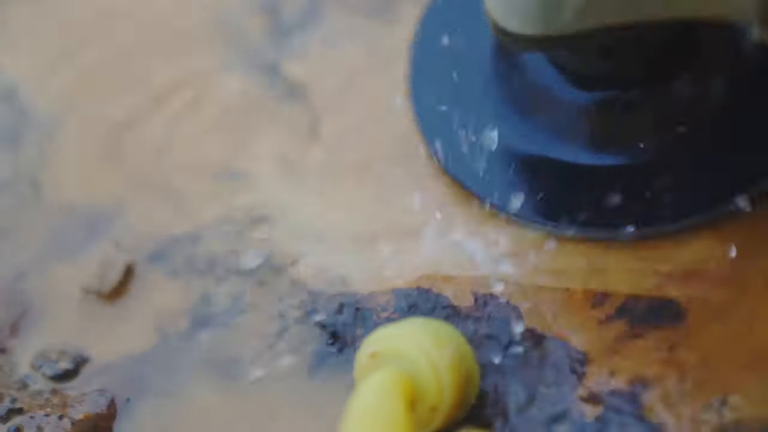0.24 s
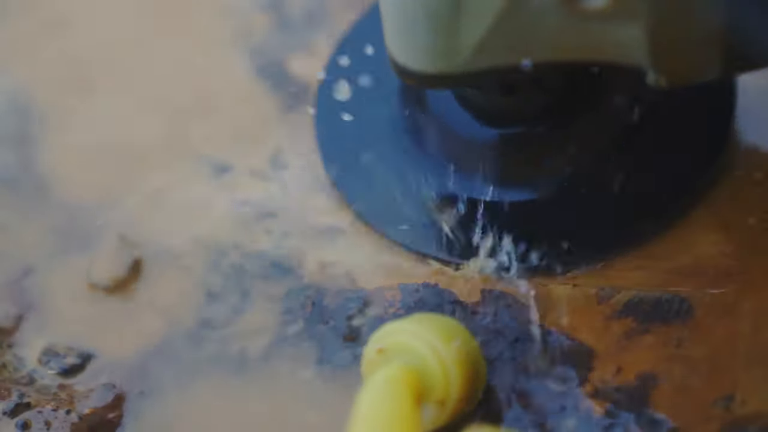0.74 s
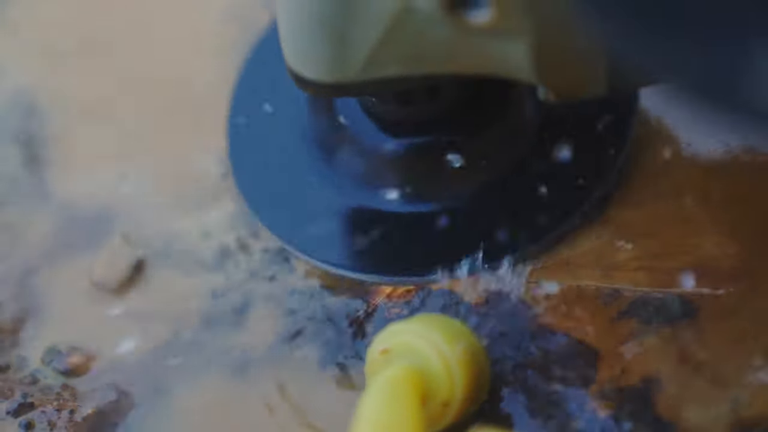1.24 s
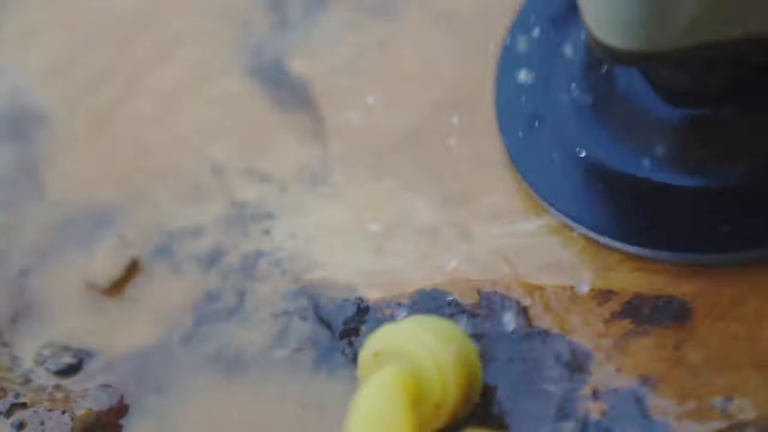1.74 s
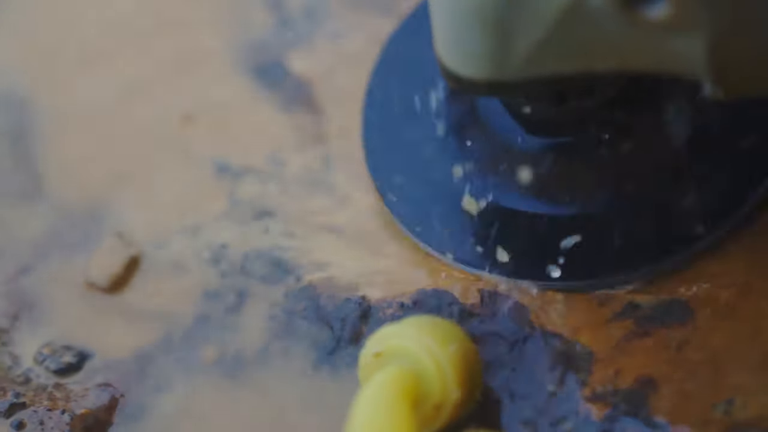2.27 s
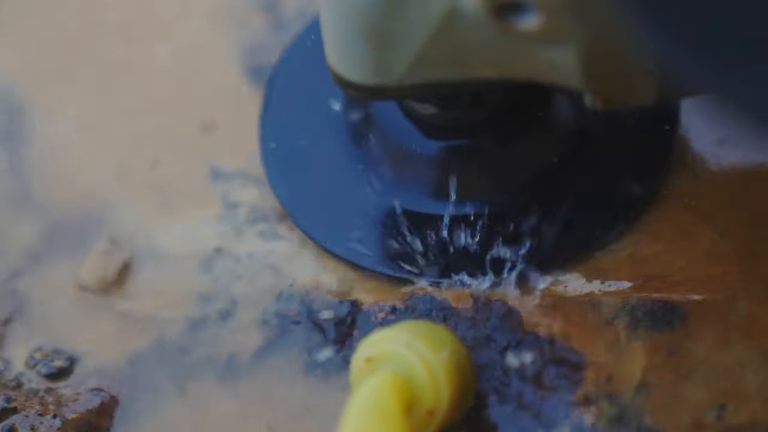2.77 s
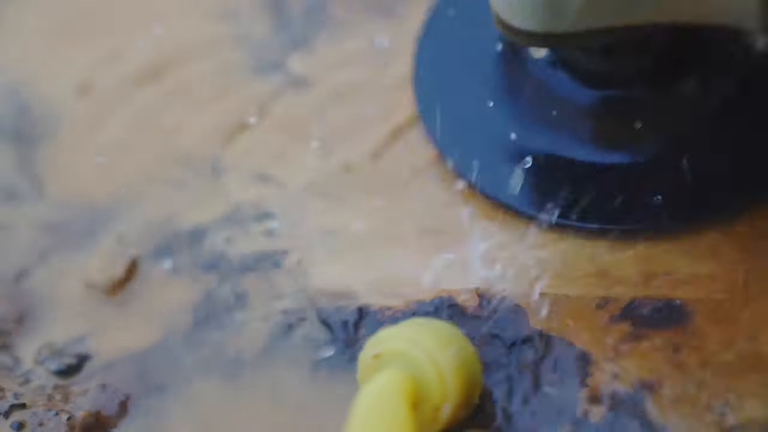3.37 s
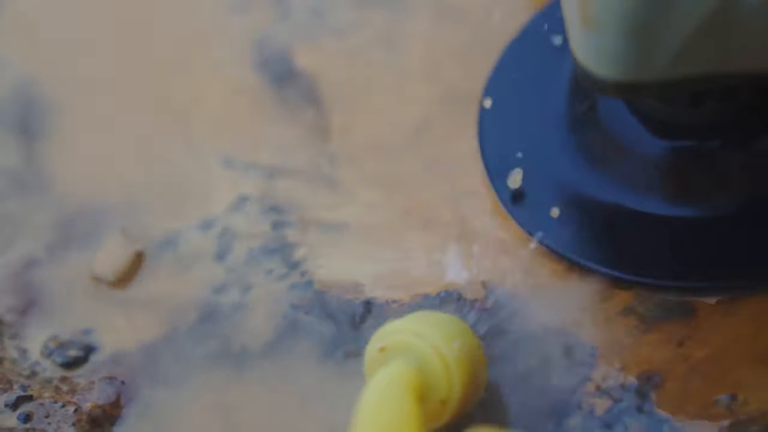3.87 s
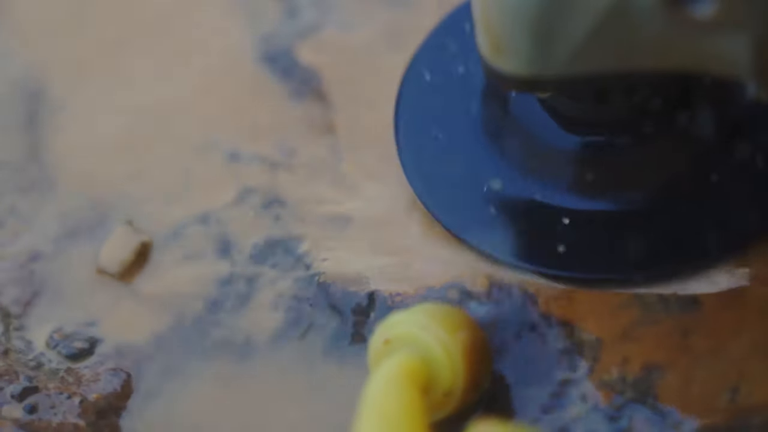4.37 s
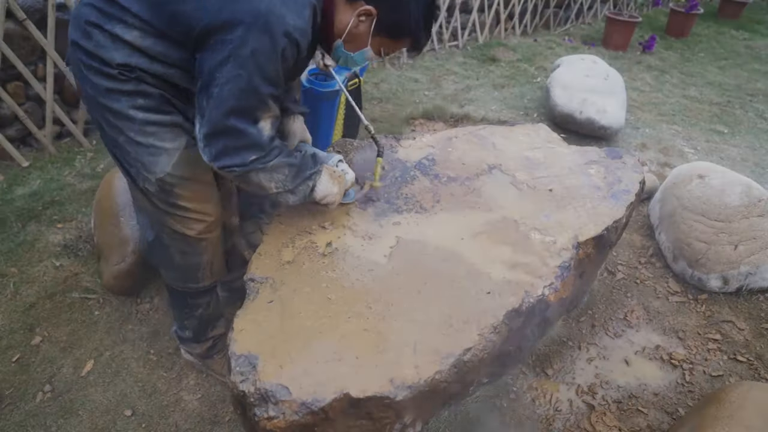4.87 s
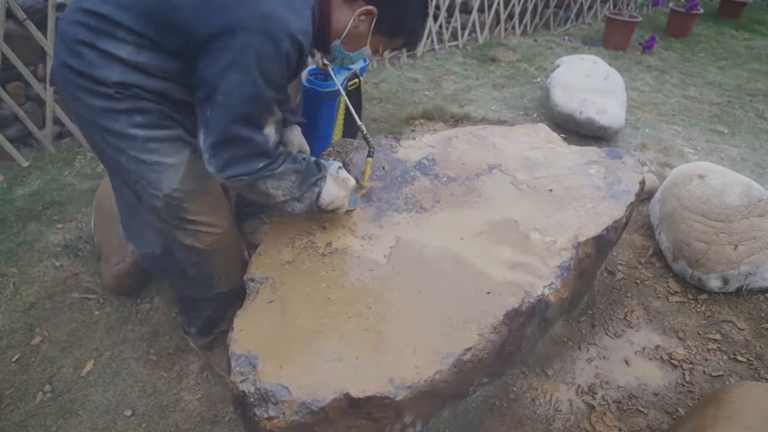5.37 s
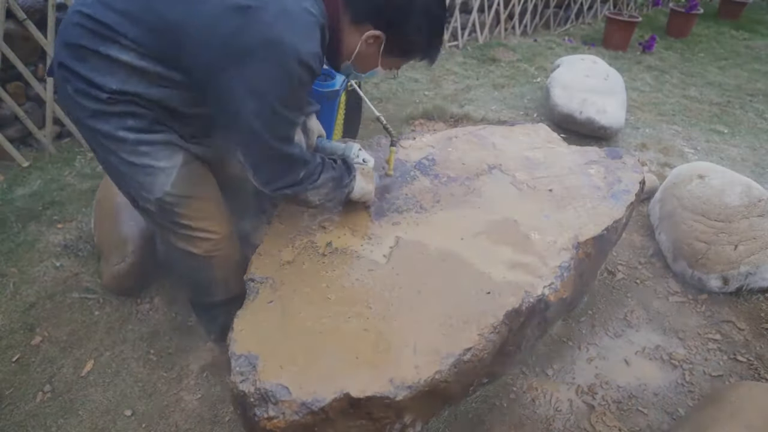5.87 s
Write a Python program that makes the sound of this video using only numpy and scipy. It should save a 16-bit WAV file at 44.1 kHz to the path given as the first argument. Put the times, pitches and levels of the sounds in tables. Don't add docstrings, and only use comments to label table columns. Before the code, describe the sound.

Close up outdoors, an electric grinder works a wet stone slab with a coarse, pulsing scrape. Pressing slows the motor, bringing gear whine, knocks and a low stone rumble; easing off lets it speed up with a clearer fan tone and bright disc ringing towards the right. After four and a half seconds it cuts to a view a few metres off: a steadier, nearly centred resonant hiss with soft puffs of water spray.

```python
import sys
import numpy as np
from scipy import signal
from scipy.fft import rfft, irfft, next_fast_len
from scipy.io import wavfile
from scipy.ndimage import uniform_filter1d, map_coordinates

SR = 44100
rng = np.random.default_rng(int(sys.argv[2]) if len(sys.argv) > 2 else 0)


def invert_db(level):
    return 10 ** (np.asarray(level, dtype=float) / 20)


def master(y):
    cut = np.clip(np.atleast_2d(y).T, -1, 1)
    pcm = np.round(cut * 32767)
    wavfile.write(sys.argv[1], SR, pcm.astype(np.int16))


N = 269892
TIME = np.arange(N) / SR
CHANGE_S = 4.568

# t/s, contact with the stone level/dB, left-right lean level/dB
HAND = [(0, -26, 0.5), (.18, -24.5, -2), (.36, -26, -6), (.7, -25, -3.5), (1, -25, -1.5), (1.42, -26.5, -1),
        (1.6, -25, -1.5), (1.75, -27, -8), (2.15, -26.5, -4.5), (2.46, -26, -2), (2.8, -24.5, -2),
        (3.18, -26, .5), (3.41, -25, -2.5), (3.53, -29.5, -8), (3.9, -31.5, -7), (4.0, -27.5, -5.5),
        (4.2, -29, -5.5), (4.56, -28.5, -3.5)]
# t/s, spindle f/Hz, torque on the gears level/dB
SPINDLE = [(0.0, 77.4, -5), (0.23, 96.45, -7), (0.47, 105.5, -16), (0.93, 79.49, -4.5), (1.3, 73.87, -2.5),
           (1.5, 82.13, 2), (1.74, 102.8, -12), (1.97, 104.4, -8), (2.28, 79.75, -8), (2.58, 71.23, -2),
           (2.98, 73.7, 1.5), (3.14, 77.1, 0.5), (3.25, 84.44, 4.5), (3.42, 98.94, -3), (3.58, 105.4, -18),
           (3.86, 103.7, -5), (4.28, 77.5, -4.5), (4.57, 71.25, -8)]
# t/s, half length t/s, depth level/dB
SKIPS = [(.645, .015, -2), (0.831, 0.017, -3), (1.468, 0.0073, -2), (1.563, 0.013, -1.5),
         (1.81, 0.016, -1.5), (1.874, .012, -1.5), (2.039, .015, -0.5), (2.28, .012, -3), (3.27, .012, -2),
         (3.41, .015, -1), (4.036, .012, -3.5), (4.508, .015, -2.5), (4.584, 0.0073, -3.5),
         (5.217, 0.019, -10.5), (5.368, 0.0075, -4.5), (5.551, 0.021, -8), (5.779, 0.01, -6.5),
         (5.835, .012, -1), (5.868, .008, -5.5)]
# t/s, hiss level/dB, spray level/dB
FAR_LEVELS = [
    (4.58, -25.5, -62),
    (4.67, -24.5, -38),
    (4.77, -24.5, -52),
    (4.88, -25.5, -36),
    (5.05, -24.5, -44.5),
    (5.16, -24.5, -34),
    (5.45, -24, -35),
    (5.85, -24.5, -39),
    (6.12, -23, -34),
]

# f/Hz, density level/dB
SCRAPE_COLOUR = [(590, -41), (1000, -20.5), (1450, -11.5), (2360, -6.5), (2740, -5), (4410, -2.5),
                 (5070, -6.5), (8260, -12.5), (9720, -28), (16000, -47)]
# f/Hz, width f/Hz, level/dB
SCRAPE_MODES = [(1900, 175, 8.5), (2330, 140, 0.67), (2475, 24, 2.4), (3000, 430, 3.4), (4486, 120, 5.3),
                (4800, 130, 2.2)]
# f/Hz, density level/dB
SLAB_COLOUR = [(12, -71), (28, -25), (64, -26), (165, -18), (399, -11), (582, -5), (801, -8), (914, -3),
               (1060, -12), (1800, -9), (2340, -5), (3960, -120)]
# f/Hz, width f/Hz, level/dB
SLAB_MODES = [(200, 13, -1.5), (660, 105, 3), (1240, 100, 10)]
# f/Hz, width f/Hz, level/dB
SLAB_RING = [(908, 26, 0)]
# f/Hz, width f/Hz, level/dB
GEAR_CASE = [(700, 400, -10), (1150, 500, -9), (1950, 450, -2), (2500, 350, 0), (3600, 1500, -8),
             (5000, 2500, -11)]
# f/Hz, width f/Hz, level/dB
CASE_RING = [(2545, 60, 0), (4480, 120, -2)]

# f/Hz, width f/Hz, level/dB
PRESSED = [(5620, 520, -3), (5820, 89, 0.5)]
# f/Hz, width f/Hz, level/dB
FREE = [(6410, 93, 0), (6606, 150, 0)]
# f/Hz, width f/Hz, level/dB
DISC_LOOSE = [(7300, 110, -13), (7840, 160, -3.5), (8210, 97, -5), (8970, 130, -0.5), (9080, 85, -6),
              (9200, 70, -2.5)]
# f/Hz, width f/Hz, level/dB
DISC_HELD = [(7380, 130, -6), (7780, 80, -5), (8080, 300, -4), (8100, 300, -10), (8660, 170, -10.5),
             (8940, 155, -1.5)]
# f/Hz, width f/Hz, level/dB
DISC_TOP_LOOSE = [(10380, 154, -1), (11200, 130, -10.5), (11490, 91, 0), (12640, 120, -3), (13000, 90, -5),
                  (13500, 700, -14), (14350, 200, -7.5), (15440, 230, -7)]
# f/Hz, width f/Hz, level/dB
DISC_TOP_HELD = [(10520, 190, 0.5), (11440, 200, -3.5), (11700, 100, -1.5), (12660, 260, 0),
                 (12800, 110, -6), (14380, 230, -2.5), (15500, 260, -4.5)]

# f/Hz, width f/Hz, level/dB
FAR_MODES = [(3600, 200, -4), (3780, 170, -2), (4090, 170, -2), (4480, 280, -5), (5630, 190, -1),
             (6050, 190, 0), (6930, 150, -3), (7670, 100, -2)]
# f/Hz, width f/Hz, level/dB
FAR_TOP = [(9120, 130, 3), (10800, 310, 1.5), (11200, 300, -5), (12400, 300, -13), (12800, 200, -8),
           (14000, 270, 0)]
# f/Hz, width f/Hz, level/dB
SPLASH = [(2320, 390, -6), (2790, 710, 0)]
# f/Hz, density level/dB
FAR_LOW = [(12, -58), (50, -25), (188, -20), (340, -13.5), (465, -16.5), (676, -7), (1020, -8.5),
           (1170, -5), (2200, -1), (2860, -27), (4840, -120)]
# f/Hz, density level/dB
FAR_BED = [(1200, -56), (3400, -6.5), (4850, -6), (5700, 2.5), (8640, -10), (14000, -12), (14450, -20),
           (15800, -20)]
# f/Hz, left-right likeness
NEAR_ALIKE = [(60, 0.65), (180, 0.91), (550, 0.86), (1650, 0.63), (4970, 0.45), (15000, 0.35)]
# f/Hz, left-right likeness
FAR_ALIKE = [(60, 0.52), (180, 0.95), (550, 0.98), (1650, 0.88), (4970, 0.72), (15000, 0.77)]

UPRIGHT_DB, TIPPED_DB = -1, -8
USUAL_CONTACT_DB = -26
# level/dB running free, gain/dB under load (fan: braking), dB per dB of contact
UNBALANCE, SECOND, FAN, UPPER = (-75, 13.6, 2.21), (-60.5, -4, 0.3), (-41.5, -9.5, -0.33), (-44, -13, -0.85)
# level/dB tipped, gain/dB lying flat, dB per dB of contact
SLAB_LAW, PRESSED_LAW, FREE_LAW = (-36.5, 4.46, 1), (-34.5, 10.3, 0.35), (-29, -5.5, 0.093)
TOP_LAW, RING_LAW = (-28.5, -3.1, 0.18), (-26.5, 0.11, 0.12)


def grind(held, turns):
    contact_db, pan_db, flat = hand()
    slab_db = law(SLAB_LAW, (flat + held) / 2, contact_db)
    pressed_db = law(PRESSED_LAW, flat ** 1.44, contact_db)
    bite = throb(turns, beat_db=2.1, grit_db=1.1)
    face = worn(turns, life=7)
    blows = knocks(turns, sharp=9, scatter_db=1.3)

    def scrape_gain(hz):
        return invert_db(along(SCRAPE_COLOUR, hz)) * np.hypot(1, peaks(SCRAPE_MODES, hz))

    def slab_gain(hz):
        return invert_db(along(SLAB_COLOUR, hz)) * np.hypot(1, peaks(SLAB_MODES, hz))

    scrape = hiss(scrape_gain, NEAR_ALIKE, bite, patchy_db=1.1, repeat=0.45 * face)
    knock = hiss(lambda hz: peaks(GEAR_CASE, hz) ** 1.3, NEAR_ALIKE, blows, patchy_db=1.2)
    hum = hiss(lambda hz: peaks(CASE_RING, hz) ** 1.8, NEAR_ALIKE, bite, patchy_db=0.5)
    slab = hiss(slab_gain, NEAR_ALIKE, bite, patchy_db=1.8, lag_s=3e-5, repeat=0.42 * face)
    note = hiss(lambda hz: peaks(SLAB_RING, hz) ** 2.0, NEAR_ALIKE, 1, patchy_db=6.0)
    pressed = hiss(lambda hz: peaks(PRESSED, hz) ** 1.03, [(6000, 0.56)], bite, patchy_db=1.5)

    case = invert_db(-8 + 3.5 * held) * knock + invert_db(-22 + 15 * held) * hum
    broad = invert_db(contact_db - 0.5) * (scrape + case) + invert_db(pressed_db - 1.5) * pressed
    low = invert_db(slab_db - 1.5) * (slab + invert_db(-16 + 8.5 * held) * note)
    return placed(broad, pan_db) + placed(low, 0.22 * pan_db)


def disc(held, turns):
    contact_db, lean_db, flat = hand()
    ring_db = law(RING_LAW, flat, contact_db)
    free_db = law(FREE_LAW, flat, contact_db)
    top_db = law(TOP_LAW, flat, contact_db)
    pan_db = 1.04 * lean_db - 3
    loose, tight = np.cos(np.pi / 2 * held), np.sin(np.pi / 2 * held)
    stir = throb(turns, beat_db=1.4, grit_db=0.93)

    def sing(modes, alike, lag_s, steep=1.15):
        return hiss(lambda hz: peaks(modes, hz) ** steep, [(9000, alike)], stir, patchy_db=3.5, lag_s=lag_s)

    middle = loose * sing(DISC_LOOSE, 0.42, 0.00013) + tight * sing(DISC_HELD, 0.64, 0.00013)
    top = loose * sing(DISC_TOP_LOOSE, 0.17, 0, steep=1.2) + tight * sing(DISC_TOP_HELD, 0.42, 0, steep=1.1)
    free = invert_db(free_db + 0.5) * sing(FREE, 0.89, 4e-5)
    return placed(invert_db(ring_db + 1.03) * middle + invert_db(top_db + 0.3) * top + free, pan_db)


def motor(speed, torque_db, held, turns):
    contact_db = hand()[0]
    slowing = -uniform_filter1d(np.gradient(speed) * SR, size=4000)
    braking = np.clip(slowing / 52, 0, 1)
    first_db = law(UNBALANCE, held, contact_db)
    second_db = law(SECOND, held, contact_db)
    upper_db = law(UPPER, held, contact_db)
    fan_db = law(FAN, braking, contact_db)
    mesh_db = -31 + torque_db
    shudder_s, half_s, shudder_db = 3.97, 0.1, 11
    second_db = second_db + shudder_db * np.exp(-((TIME - shudder_s) / half_s) ** 2)

    def tone(order, rough):
        return invert_db(3.2 * wobble(24.91)) * np.sin(2 * np.pi * order * turns + rough * wobble(35))

    mesh = 0
    for order, share in [(31, 0.35), (32, 0.8), (33, 0.6), (34, 0.4)]:
        mesh = mesh + peaks([(2450, 800, 0)], order * speed) * share * tone(order, 1.5)
    second = 1.24 * peaks([(198, 20, 0)], 2 * speed) * tone(2, 0.53)
    shake = second + 1.05 * tone(3, 0.58) + 0.79 * tone(4, 0.4)
    low = invert_db(first_db - 0.5) * tone(0.98, 0.2) + invert_db(second_db + 1.0) * shake
    whine = invert_db(fan_db + 2.5) * tone(12, 0.94) + invert_db(upper_db + 1.0) * tone(18, 1.0) + invert_db(mesh_db + 3.5) * mesh
    return low + whine * invert_db([[-1.5], [1.5]])


def distant():
    hiss_db, splash_db = curves(FAR_LEVELS)
    since = np.maximum(TIME - CHANGE_S, 0)
    low_db = -49 + 5.5 * since
    top_db = -32.5 - 17 * np.exp(-since / 0.11)
    chatter = throb(76 * TIME, beat_db=0.3, grit_db=0.36)

    def body_gain(hz):
        return np.hypot(peaks(FAR_MODES, hz) ** 1.4, invert_db(along(FAR_BED, hz) - 7))

    body = hiss(body_gain, FAR_ALIKE, chatter, patchy_db=2.2, lag_s=-2e-5)
    low = hiss(lambda hz: invert_db(along(FAR_LOW, hz)), FAR_ALIKE, chatter, patchy_db=3.0)
    splash = hiss(lambda hz: peaks(SPLASH, hz) ** 1.44, FAR_ALIKE, chatter, patchy_db=3.5)
    top = hiss(lambda hz: peaks(FAR_TOP, hz) ** 1.3, FAR_ALIKE, chatter, patchy_db=4.3, lag_s=-0.000023)
    near_ground = invert_db(hiss_db + 3.0) * body + invert_db(low_db + 1.6) * low
    return near_ground + invert_db(splash_db) * splash + invert_db(top_db - 1.0) * top


def hand():
    contact_db, lean_db = curves(HAND)
    return contact_db, lean_db, np.clip((lean_db - TIPPED_DB) / (UPRIGHT_DB - TIPPED_DB), 0, 1)


def law(rule, share, contact_db):
    base_db, gain_db, follows = rule
    return base_db + gain_db * share + follows * (contact_db - USUAL_CONTACT_DB)


def throb(turns, beat_db, grit_db):
    once = (1 + 0.35 * wobble(15)) * np.cos(2 * np.pi * (turns - 0.5))
    twice = 0.4 * np.cos(4 * np.pi * turns + 0.8 * wobble(8))
    grit = wobble(70) + 0.3 * wobble(25) + 0.6 * wobble(300)
    return invert_db(beat_db * (once + twice) + grit_db * grit)


def worn(turns, life, count=160):
    face = rng.standard_normal((2, int(turns[-1] / life) + 3, count))
    face = np.concatenate([face, face[..., :3]], axis=2)
    place = [turns / life, turns % 1 * count + 1]
    return np.array([unit(map_coordinates(side, place, order=2)) for side in face])


def knocks(turns, sharp, scatter_db):
    whole = np.floor(turns).astype(int)
    size, late = rng.standard_normal((whole[-1] + 1, 2)).T
    from_blow = turns - whole - 0.5 - 0.06 * late[whole]
    return invert_db(scatter_db * size[whole]) * np.exp(-(sharp * from_blow) ** 2)


def hiss(gain, alike, drive, patchy_db, lag_s=0, repeat=0):
    z = signal.stft(rng.standard_normal((2, N)) + repeat, nperseg=512)[2]
    field = uniform_filter1d(rng.standard_normal(z.shape), size=4, axis=1)
    field = uniform_filter1d(field, size=10, axis=2)
    patchy = z * invert_db(patchy_db * field / field.std())
    pair = signal.istft(patchy, nperseg=512)[1][:, :N] * drive
    size = next_fast_len(N + 8192)
    hz = np.fft.rfftfreq(size, 1 / SR)
    turn = np.arccos(np.clip(along(alike, hz), -1, 1)) / 2
    common, opposed = rfft(pair, size) * gain(hz) * [np.cos(turn), np.sin(turn)]
    ramp = np.exp(1j * np.pi * hz * lag_s)
    sides = np.array([(common + opposed) / ramp, (common - opposed) * ramp])
    return unit(irfft(sides, size)[:, :N])


def peaks(modes, hz):
    power = 0
    for centre, width, db in modes:
        power = power + invert_db(2 * db) * (hz * width) ** 2 / ((centre ** 2 - hz * hz) ** 2 + (hz * width) ** 2)
    return np.sqrt(power)


def placed(pair, pan_db):
    gains = invert_db(np.array([pan_db / 2, -pan_db / 2]))
    return pair * gains / gains.mean(0)


def wobble(rate):
    return map_coordinates(rng.standard_normal(int(N * rate / SR) + 4), [TIME * rate], order=2)


def curves(rows):
    s, *columns = np.transpose(rows)
    return [np.interp(TIME, s, column) for column in columns]


def along(points, hz):
    f, v = np.transpose(points)
    return np.interp(np.log(hz + 1), np.log(f + 1), v)


def unit(x):
    return x / np.sqrt(np.mean(np.atleast_2d(x).mean(0) ** 2) + 1e-20)


def scene():
    speed, torque_db = curves(SPINDLE)
    turns = np.cumsum(speed) / SR
    held = np.clip((99 - speed) / 21, 0, 1)
    near = grind(held, turns) + disc(held, turns) + motor(speed, torque_db, held, turns)
    away = np.clip((TIME - CHANGE_S) / 0.0017, 0, 1)
    dips_db = sum(db * np.exp(-((TIME - s) / half_s) ** 4) for s, half_s, db in SKIPS)
    return invert_db(dips_db) * ((1 - away) * near + away * distant())


def low_pass(x):
    return signal.sosfilt(signal.butter(12, 16470, fs=SR, output="sos"), x)


def record(dry):
    dry = dry / (1 + np.abs(dry / 0.8) ** 4) ** (1 / 4)
    hz, _, z = signal.stft(dry, SR, nperseg=2048, noverlap=1024)
    power = np.abs(z[:, :1024]) ** 2
    bands = power.reshape(2, 64, 16, -1).mean(2).repeat(16, 1)
    heard = bands > power.mean((0, 1)) * invert_db(-2 * 12.6)
    below = hz[:1024, None]
    z[:, :1024] *= (heard | (below < 8500)) & (below < 15740)
    z[:, 1024] = 0
    z *= (hz ** 2 / (hz ** 2 + 40 ** 2))[:, None]
    mix = signal.istft(z, SR, nperseg=2048, noverlap=1024)[1][:, :N]
    return low_pass(mix)


dry = scene()
out = record(dry)
master(out)
```